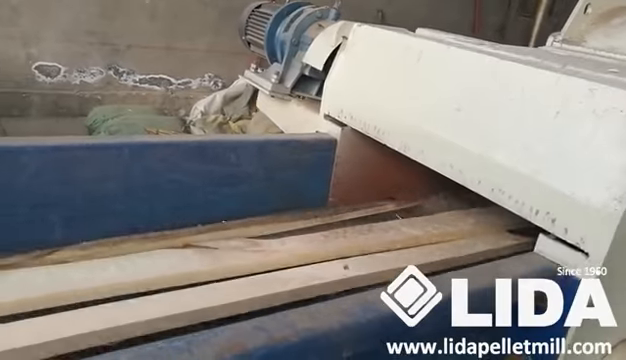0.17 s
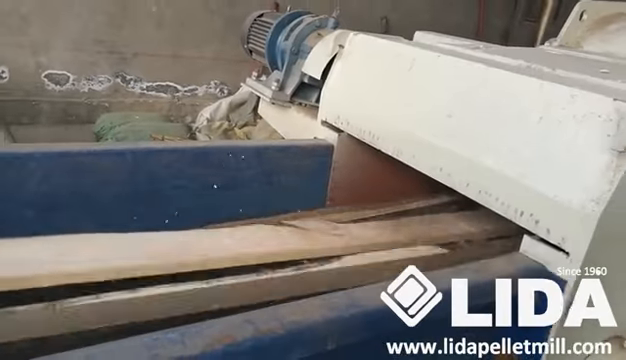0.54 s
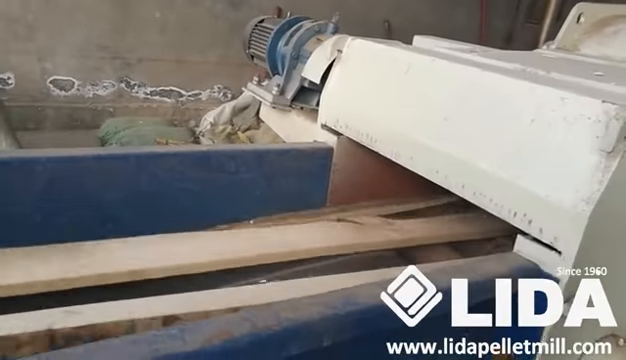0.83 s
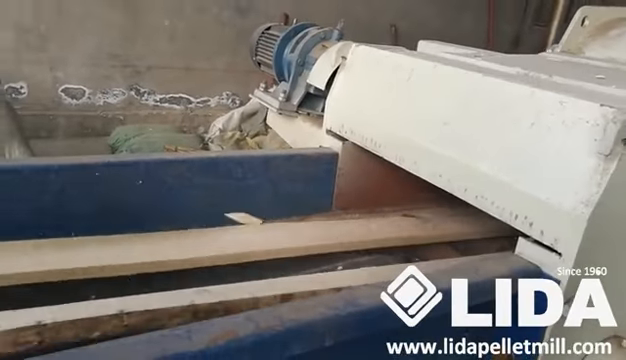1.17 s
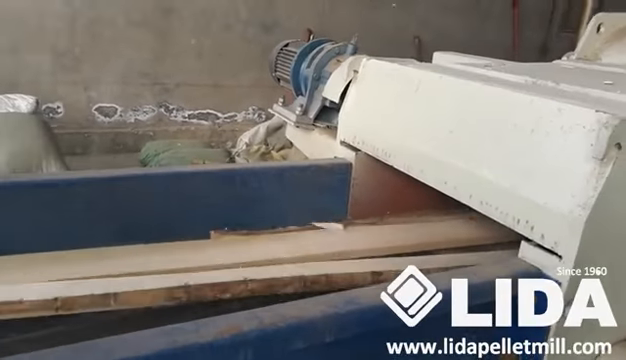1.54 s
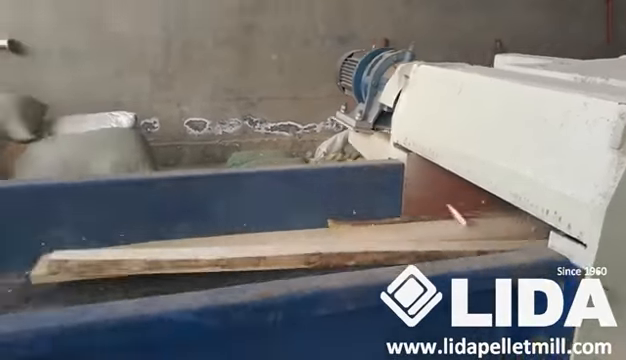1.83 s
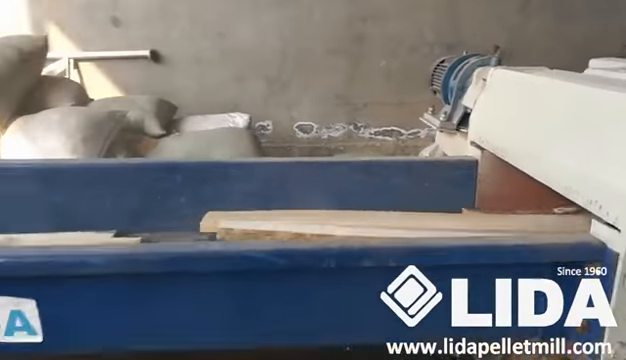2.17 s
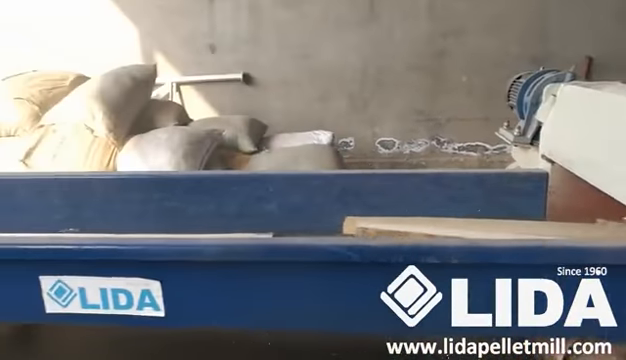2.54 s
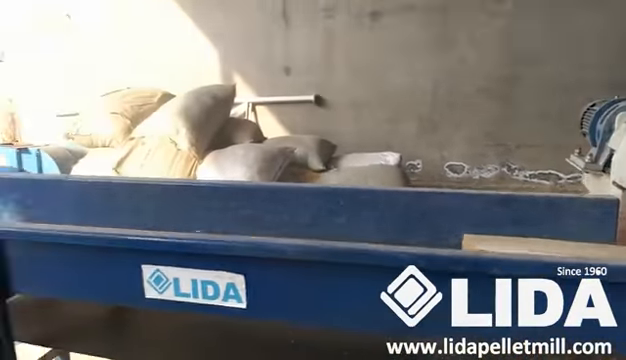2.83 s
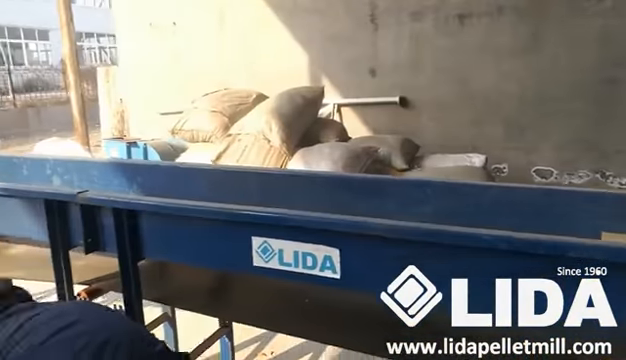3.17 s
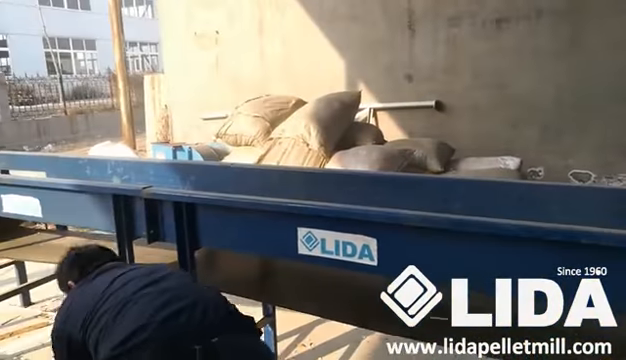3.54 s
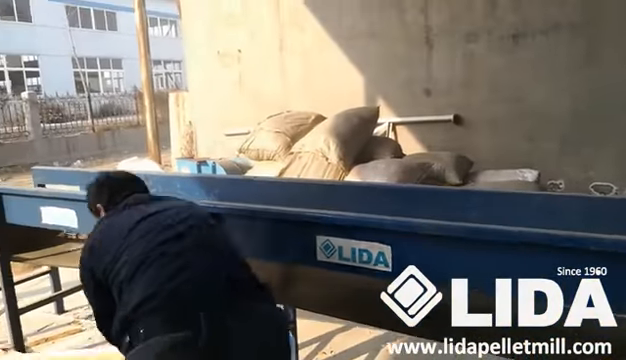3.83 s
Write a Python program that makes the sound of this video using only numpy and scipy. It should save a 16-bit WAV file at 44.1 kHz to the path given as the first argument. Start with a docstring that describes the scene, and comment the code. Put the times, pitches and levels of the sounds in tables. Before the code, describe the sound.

A wood chipper runs close by in a concrete hall, planks clacking on its rushing conveyor. At about 0.9 seconds the knives bite, chopping in loud, rapid, splintering surges that slightly overload the microphone. Chips rattle through a steel duct from around 1 second as the machine rumbles and booms. A low drone swells after 2 seconds; the chopping eases from about 2.7, with two more knocks near 3.3.

```python
"""Drum wood chipper in a concrete hall

Planks knock along the feed conveyor, then the knives chop them about 38 times a second.
Each cut cracks, rings the planks and housing and thuds in the frame. Chips rattle through
the duct and the drum drones. The microphone turns away from the mouth and overloads."""
import sys
import numpy as np
from scipy import signal
from scipy.fft import rfft, irfft, next_fast_len
from scipy.io import wavfile
from scipy.ndimage import uniform_filter1d, map_coordinates

SR = 44100
rng = np.random.default_rng(int(sys.argv[2]) if len(sys.argv) > 2 else 0)


def dump_mix(stems):
    """Bounce the given channels to the path in sys.argv[1] as a 16-bit WAV at rate SR."""
    frames = np.atleast_2d(stems).T  # one column per channel
    limited = np.clip(frames, -1, 1)  # hard clip at full scale
    pcm = np.round(limited * 32767).astype(np.int16)
    wavfile.write(sys.argv[1], SR, pcm)


N = 176400
TIME_S = np.arange(N) / SR

# cutting strength: time_s, bark_db, crack_db
BITE = [(0.86, -13.5, -12), (0.93, -7, -9.5), (0.99, -24.5, -19), (1.15, -22.5, -18), (1.19, -11.5, -13),
        (1.32, -13, -15), (1.39, -10, -9.5), (1.465, -22.5, -17.5), (1.495, -9.5, -8.5), (1.7, -9, -8.5),
        (1.95, -8, -12), (2.13, -14, -11.5), (2.42, -9, -9.5), (2.57, -7, -12), (2.7, -17.5, -12.5),
        (3.15, -17.5, -12.5), (3.55, -18, -23.5), (3.95, -14, -19)]
# planks' bark spectrum: freq_hz, gain_db
BARK_SPECTRUM = [(200, -41), (500, -8.5), (800, -16), (1100, -3), (1450, 1), (1850, -1), (2400, -10.5),
                 (3500, -20), (7500, -29)]
# splinter spectrum: freq_hz, gain_db
CRACK_SPECTRUM = [(900, -41), (2000, 5.5), (3000, 3), (4000, 2.5), (5000, -4.5), (6500, -4.5), (7800, -16)]
# steel housing: pitch_hz, level_db, t60_s
HOUSING_MODES = [(1160, -5, .08), (1373, -3, .08), (1684, -1, .07), (1765, -3, .06), (2340, -3, .06)]
# gripped plank's note, shifting as it is eaten: time_s, pitch_hz
PLANK_NOTE = [(.86, 1370), (1.2, 1503), (2.05, 1503), (2.4, 1390), (2.8, 1570)]
# left-right likeness at the mouth: freq_hz, correlation
DIRECT_STEREO = [(250, 1), (500, 0.2), (1000, 1), (1600, 0.28), (3500, 0.8), (7000, 0.12)]

def cutting(blows, bark_attack_s=.0025):
    """Each cut tears fibres: splinters crack, the planks bark and sing, the housing rings."""
    def strokes(attack_s, decay_s):
        return unit(signal.fftconvolve(blows, burst(0, attack_s, decay_s, ending=1.7))[:N])

    def housing(f):
        return sum(amp(db) * resonance(f, hz, width_hz=np.log(1000) / np.pi / t60_s)
                   for hz, db, t60_s in HOUSING_MODES)

    bark_db, crack_db = curves(BITE)
    bend = amp(bark_db) * strokes(bark_attack_s, decay_s=.017)
    bark = bend * patchy(rush(BARK_SPECTRUM, DIRECT_STEREO), depth_db=2.4)
    splinters = coloured(grains(per_s=9000, spread_db=2), CRACK_SPECTRUM, DIRECT_STEREO)
    crack = amp(crack_db) * strokes(attack_s=.0008, decay_s=.013) * patchy(splinters, depth_db=2.7)
    ring = np.std(bend) * unit(filtered(bend * rush(BARK_SPECTRUM, DIRECT_STEREO), housing))
    phase = 2 * np.pi * np.cumsum(curves(PLANK_NOTE)[0]) / SR + wobble(20) / 2
    note = amp(bark_db) * strokes(bark_attack_s, decay_s=.03) * unit(np.sin(phase))
    return amp(-4) * bark + amp(-5.5) * crack + amp(-12) * ring + amp(-14) * note


# harder bites: time_s, level_db
HARD_CUTS = [(.856, 5.5), (.909, 0.5), (1.068, 3.5), (1.175, 2), (1.281, 3.5), (1.307, 7), (1.385, 3),
             (1.493, 1.5), (1.68, 2.5), (2.80, 4), (3.17, 4), (3.36, 6.5), (3.68, 5)]

def knife_blows(scatter_db=.8, jitter_s=.0005):
    """One impulse per knife meeting the wood."""
    passes = knife_passes()
    cut_s = np.interp(np.arange(int(passes[-1]) + 1), passes, TIME_S)
    strength, timing = rng.standard_normal((len(cut_s), 2)).T
    level_db = scatter_db * strength
    for time_s, hard_db in HARD_CUTS:
        level_db[np.argmin(abs(cut_s - time_s))] = hard_db
    starts = np.clip((cut_s + jitter_s * timing) * SR, 0, N - 1).astype(int)
    return np.bincount(starts, amp(level_db), N)


# drum speed: time_s, cuts_per_s
DRUM_SPEED = [(0, 37.65), (2.35, 37.65), (2.6, 37.48), (3.5, 37.5), (4, 37.2)]

def knife_passes(first_cut_s=.855):
    """Drum rotation in knife passes since the first cut."""
    passes = np.cumsum(curves(DRUM_SPEED)[0]) / SR
    return passes - np.interp(first_cut_s, TIME_S, passes)


# conveyor knocks, and at 0.829 s the knives' weak first bite: start_s, level_db, pitch_hz, decay_s
KNOCKS = [(0.013, -14, 2660, 0.017), (.076, -23, 1530, 0.016), (.143, -22, 797, 0.02),
          (0.207, -27, 862, 0.01), (.345, -26, 1098, 0.037), (0.382, -17.5, 990, 0.017),
          (.43, -27, 752, 0.031), (0.551, -24, 1380, 0.007), (0.624, -26.5, 1960, 0.007),
          (0.724, -14.5, 1086, 0.014), (.756, -18, 996, 0.015), (.777, -14, 1224, 0.017),
          (0.829, -21.5, 1285, 0.061), (1.003, -22, 352.5, 0.034), (3.278, -13, 827, 0.011),
          (3.391, -19, 1746, 0.016)]
# clack spectrum: freq_hz, gain_db
CLACK_SPECTRUM = [(60, -57.5), (200, -5), (500, 7), (1000, 7.5), (1600, 3.5), (2800, 1), (4500, -9.5),
                  (7800, -28)]

def plank_knocks(note_q=22):
    """Planks jump on the conveyor: a dry clack and a hollow note; long contacts start softly. The knock at
    0.829 s is the knives' first weak bite, just before the cutting proper."""
    clack = rush(CLACK_SPECTRUM, DIRECT_STEREO)
    out = np.zeros((2, N))
    for start_s, level_db, pitch_hz, decay_s in KNOCKS:
        note = np.sqrt(2) * np.sin(2 * np.pi * pitch_hz * (TIME_S - start_s) + wobble(pitch_hz / note_q))
        out += amp(level_db) * burst(start_s, .09 * decay_s, decay_s) * (clack + note)
    return out


# chip flow: time_s, level_db
CHIP_FLOW = [(0, -88), (.75, -29), (1.0, -22.5), (1.5, -14.5), (2.5, -17), (3.2, -17), (4, -17.5)]
# duct spectrum: freq_hz, gain_db
DUCT_SPECTRUM = [(150, -18.5), (330, -5.5), (480, -11), (700, -12), (950, -8.5), (1400, -12.5),
                 (2000, -2.5), (3200, -4), (5000, -8.5), (7800, -18)]
# chip panning: freq_hz, left_minus_right_db
CHIP_BALANCE = [(1000, -1), (1500, 8.5), (3000, -7.5), (4200, -5.5), (5400, -10), (7500, -8)]
# left-right likeness of diffuse sound: freq_hz, correlation
DIFFUSE_STEREO = [(60, .98), (170, .98), (260, .7), (480, -.1), (950, .45), (2000, 0), (7000, 0)]

def small_chips(surge_db=.9):
    """Chips pelt the discharge duct in uneven surges."""
    impacts = grains(per_s=3000, spread_db=2.5)
    pelting = patchy(coloured(impacts, DUCT_SPECTRUM, DIFFUSE_STEREO), depth_db=2.4)
    panned = filtered(pelting, lambda hz: pan(along(CHIP_BALANCE, hz)))
    return amp(curves(CHIP_FLOW)[0] + surge_db * wobble(40)) * panned


def large_chips(per_s=220, centre_hz=2000, spread_octaves=1.3, spread_db=2.5, decay_s=.02):
    """Larger chips strike the steel duct, each ringing it at its own pitch."""
    count = int(per_s * N / SR)
    starts = rng.integers(N, size=count)
    t = np.arange(SR // 10) / SR
    out = np.zeros((2, N + SR))
    for start, (pitch, size, *phases) in zip(starts, rng.standard_normal((count, 4))):
        pitch_hz = centre_hz * 2 ** (spread_octaves * np.tanh(pitch))
        ring = np.sin(2 * np.pi * pitch_hz * t + np.array(phases)[:, None]) * np.exp(-t / decay_s)
        out[:, start:start + len(t)] += amp(spread_db * size) * ring
    return amp(curves(CHIP_FLOW)[0]) * unit(out[:, :N])


# frame shaking: time_s, rumble_db, boom_db
SHAKE = [(0.3, -61, -38), (0.7, -39.5, -53), (0.87, -32, -20), (1.2, -40, -34), (1.35, -30.5, -26),
         (1.75, -32.5, -18), (2.0, -31.5, -25), (2.3, -28, -21), (2.55, -28, -21.5), (2.7, -34.5, -23),
         (3.3, -41, -25), (3.9, -48, -22)]
# frame spectrum: freq_hz, gain_db
RUMBLE_SPECTRUM = [(20, -16), (40, -8.5), (70, -2), (95, -7), (140, -3.5), (300, -24)]
# side panel spectrum: freq_hz, gain_db
BOOM_SPECTRUM = [(60, -22), (115, -6.5), (150, -1), (208, 4.5), (290, 0), (350, -0.5), (450, -15),
                 (900, -35)]

def frame(blows, pulsing=.73):
    """The heavy frame rumbles and its panels boom, most just after each cut."""
    rumble_db, boom_db = curves(SHAKE)
    jolts = signal.fftconvolve(blows, burst(0, attack_s=.003, decay_s=.042))[:N]
    push = 1 + pulsing * unit(jolts)
    rumble = amp(rumble_db) * unit(push * rush(RUMBLE_SPECTRUM, DIFFUSE_STEREO))
    boom = amp(boom_db) * unit(push * rush(BOOM_SPECTRUM, DIFFUSE_STEREO))
    return amp(3) * rumble + amp(-5) * boom


# trough loudness: time_s, level_db
TROUGH_LEVEL = [(0, -34), (.8, -39), (1.5, -30), (2.5, -23), (2.9, -26), (3.7, -19.5), (4, -19)]
# trough resonances: pitch_hz, width_hz, gain_db
TROUGH_MODES = [(673, 80, 5), (840, 240, -3.5)]

def trough(flutter_db=2, left_db=-11.5):
    """The shaken steel conveyor trough sounds its hollow modes, on the right."""
    def modes(f):
        return sum(amp(db) * abs(resonance(f, hz, width_hz)) ** 2 for hz, width_hz, db in TROUGH_MODES)

    hollow = unit(filtered(rng.standard_normal((2, N)), modes))
    return amp(curves(TROUGH_LEVEL)[0] + flutter_db * wobble(25.23)) * hollow * amp([[left_db], [0]])


# drum drone: time_s, level_db
DRONE_LEVEL = [(0, -45), (.9, -48.5), (1.3, -53.5), (2.0, -40), (2.3, -27.5), (3.0, -32), (3.4, -30),
               (4, -28.5)]
# drone partials: cut_rate_multiple, level_db
DRONE_PARTIALS = [(5, -12), (6, 0), (9, -11)]
# machine running empty: freq_hz, gain_db
IDLE_SPECTRUM = [(29, -29), (50, -20.5), (149, -4.5), (549, -7.5), (989, -6), (2110, -10.5), (4310, -10.5),
                 (4990, -16), (5660, -13), (7600, -23)]

def machine(motor_hz=113, waver_db=2, waver_rad=.14, flutter_db=1):
    """The drum drones, the motor hums and the running conveyor rushes."""
    phase = 2 * np.pi * knife_passes()
    partials = sum(amp(db + waver_db * wobble(24.96)) * np.sin(multiple * phase + waver_rad * wobble(12))
                   for multiple, db in DRONE_PARTIALS)
    drone = amp(curves(DRONE_LEVEL)[0]) * partials
    motor = amp(-44) * np.sin(2 * np.pi * motor_hz * TIME_S + waver_rad * wobble(6.9))
    conveyor_db = -26 + flutter_db * wobble(35)
    conveyor = amp(conveyor_db) * patchy(rush(IDLE_SPECTRUM, DIFFUSE_STEREO), depth_db=4)
    return np.sqrt(2) * (drone + motor) + conveyor


# conveyor side wall echoes: left_delay_s, right_delay_s, gain
WALL_ECHOES = [(.0021, 0.0024, 0.091), (.0041, .0046, -0.16), (.0061, 0.0065, 0.32)]

def walls(x):
    """Short echoes off close steel walls hollow the sound."""
    def comb(hz):
        return 1 + sum(gain * np.exp(-2j * np.pi * np.outer([left_s, right_s], hz))
                       for left_s, right_s, gain in WALL_ECHOES)

    return np.std(x) * unit(filtered(x, comb))


# hall reverberation: freq_hz, t60_s
HALL_DECAY = [(100, 0.63), (1500, 0.9), (7800, 0.088)]

def hall(x):
    """The concrete hall's echo, shorter in the treble."""
    hz, t, noise = signal.stft(rng.standard_normal((2, SR // 2)), SR, nperseg=256)
    decay = amp(-60 * t / along(HALL_DECAY, hz)[:, None])
    tail = signal.istft(noise * decay, SR, nperseg=256)[1]
    return signal.fftconvolve(x, tail / np.linalg.norm(tail[0]), axes=1)[:, :N]


def amp(db):
    """Decibels to gain."""
    return 10 ** (np.asarray(db) / 20)


def pan(left_minus_right_db):
    """Left and right gains."""
    return amp(np.outer([1, -1], left_minus_right_db) / 2)


def unit(x):
    """Scale to rms 1."""
    return x / np.sqrt(np.mean(x ** 2) + 1e-20)


def along(points, hz):
    """Read (freq_hz, value) points on a log axis."""
    freq_hz, values = np.transpose(points)
    return np.interp(np.log(hz + 1), np.log(freq_hz + 1), values)


def curves(rows):
    """Per-sample curve of each column after time_s."""
    time_s, *columns = np.transpose(rows)
    return [np.interp(TIME_S, time_s, column) for column in columns]


def wobble(knots_per_s):
    """Smooth random curve."""
    knots = rng.standard_normal(int(N * knots_per_s / SR) + 4)
    return map_coordinates(knots, [TIME_S * knots_per_s])


def burst(start_s, attack_s, decay_s, ending=1):
    """Envelope of one blow; a higher ending holds longer, then stops faster."""
    t = np.maximum(TIME_S - start_s, 0)
    return (1 - np.exp(-t / attack_s)) * np.exp(-(t / decay_s) ** ending)


def filtered(x, response):
    """Apply a complex frequency response."""
    size = next_fast_len(N + SR // 2)
    return irfft(rfft(x, size) * response(np.fft.rfftfreq(size, 1 / SR)), size)[..., :N]


def resonance(f, pitch_hz, width_hz):
    """Response of one damped mode."""
    return 1j * f * width_hz / (pitch_hz ** 2 - f ** 2 + 1j * f * width_hz)


def coloured(pair, spectrum, correlation):
    """Two unrelated signals to stereo of rms 1 with a given spectrum and correlation."""
    def response(hz):
        angle = np.arccos(np.clip(along(correlation, hz), -1, 1)) / 2
        return amp(along(spectrum, hz)) * [np.cos(angle), np.sin(angle)]

    mid, side = filtered(pair, response)
    return unit(np.array([mid + side, mid - side]))


def rush(spectrum, correlation):
    """Coloured stereo noise."""
    return coloured(rng.standard_normal((2, N)), spectrum, correlation)


def grains(per_s, spread_db):
    """Two random trains of tiny, uneven impacts."""
    hits = rng.random((2, N)) < per_s / SR
    signs = np.sign(rng.standard_normal((2, N)))
    return hits * signs * amp(spread_db * rng.standard_normal((2, N)))


def patchy(pair, depth_db):
    """Flickering colour: random gain patches over time and frequency."""
    spectra = signal.stft(pair, nperseg=512)[2]
    patches = uniform_filter1d(rng.standard_normal(spectra.shape[1:]), size=4, axis=0)
    patches = uniform_filter1d(patches, size=5, axis=1)
    return unit(signal.istft(spectra * amp(depth_db * unit(patches)), nperseg=512)[1][:, :N])


# microphone turning from the mouth: time_s, left_lag_ms, left_minus_right_db
MIC_TURN = [(0, 0.083, 1.3), (1.6, 0.013, 1.8), (2.7, 0.17, 0), (3.3, 0.21, 0.5), (4, 0.29, 2)]

def scene():
    """The mouth drifts right as the microphone turns along the conveyor."""
    blows = knife_blows()
    left, right = cutting(blows) + plank_knocks()
    lag_ms, balance_db = curves(MIC_TURN)
    late_left = map_coordinates(left, [np.arange(N) - lag_ms * SR / 1000])
    mouth = np.array([late_left, right])
    bright = walls(mouth + amp(-9) * hall(mouth) + small_chips() + amp(-5) * large_chips())
    return bright * pan(balance_db) + frame(blows) + trough() + machine()


def record(dry, band_hz=7780, top_hz=16000, gain_db=.69):
    """The narrow-band input saturates; peaks near full scale are squashed again and crackle."""
    def squash(x, ceiling, knee):
        return x / (1 + abs(x / ceiling) ** knee) ** (1 / knee)

    narrow = filtered(squash(dry, ceiling=1.07, knee=5), lambda hz: hz < band_hz)
    limited = squash(amp(gain_db) * narrow, ceiling=.96, knee=14)
    return filtered(limited, lambda hz: hz < top_hz)


dry = scene()
out = record(dry)
dump_mix(out)
```